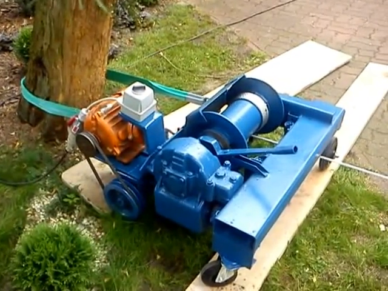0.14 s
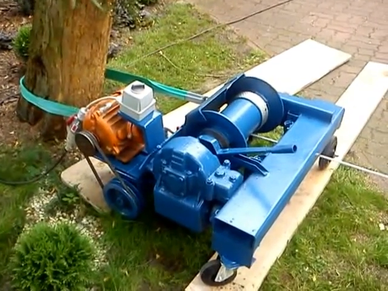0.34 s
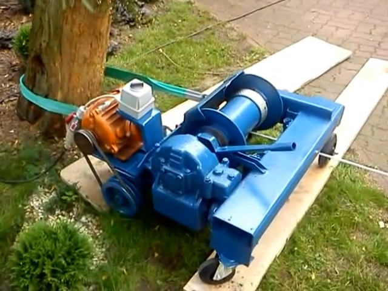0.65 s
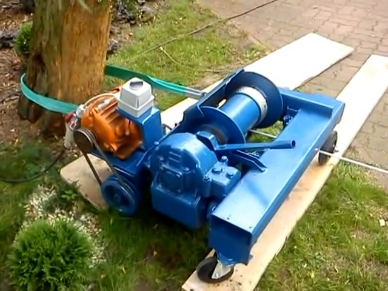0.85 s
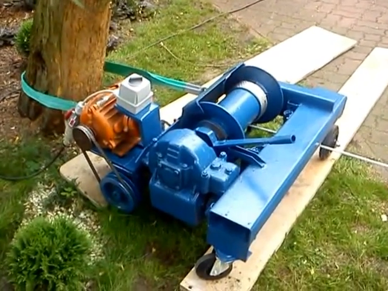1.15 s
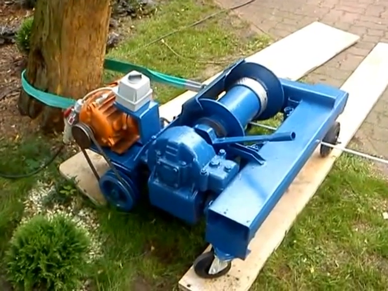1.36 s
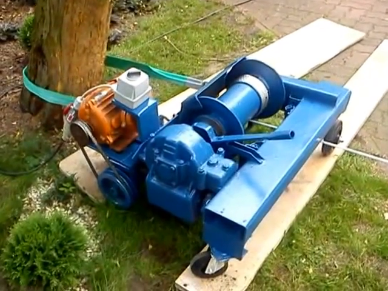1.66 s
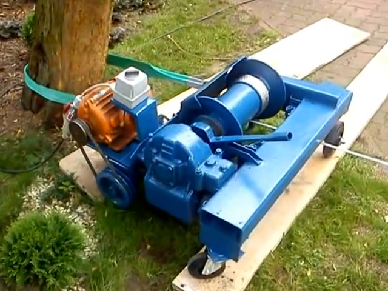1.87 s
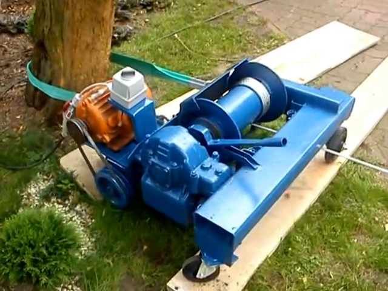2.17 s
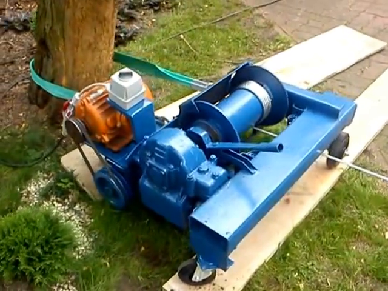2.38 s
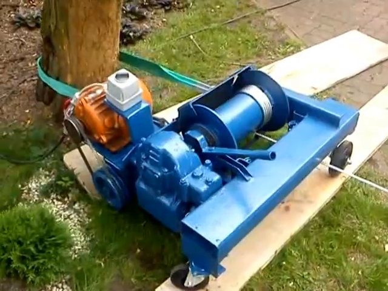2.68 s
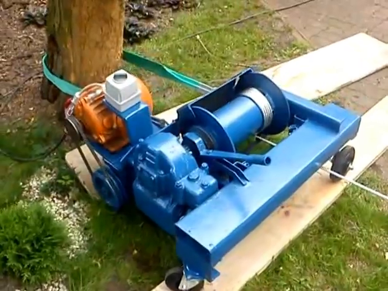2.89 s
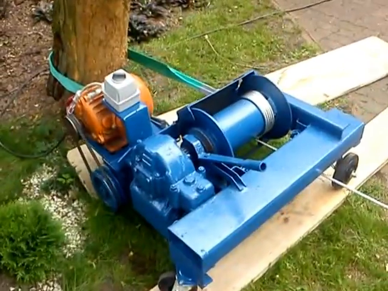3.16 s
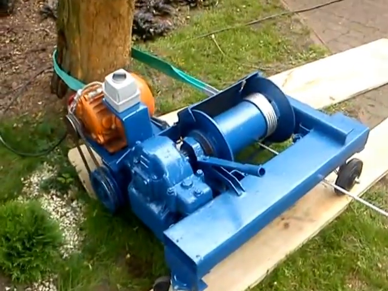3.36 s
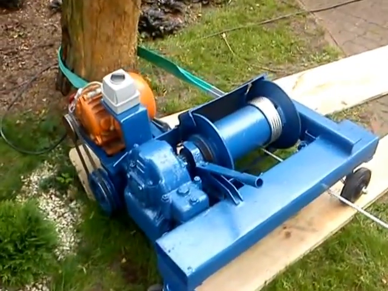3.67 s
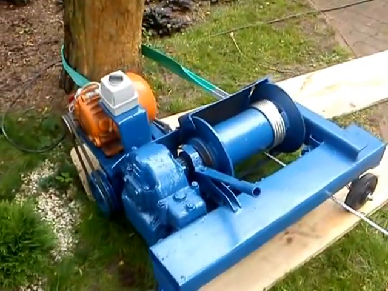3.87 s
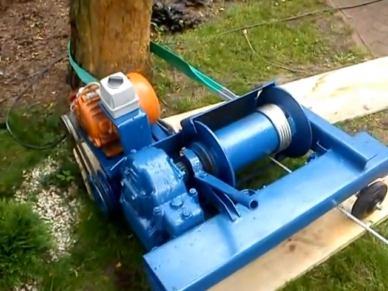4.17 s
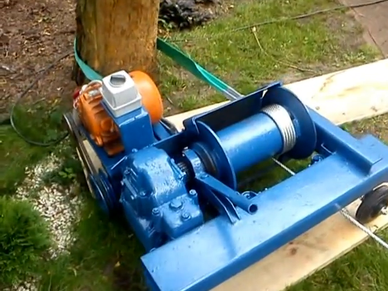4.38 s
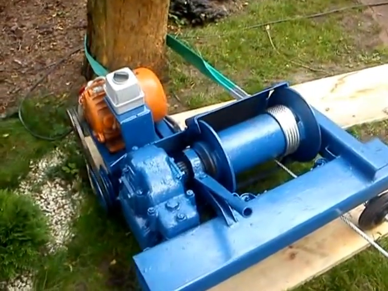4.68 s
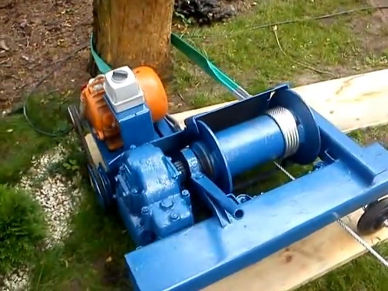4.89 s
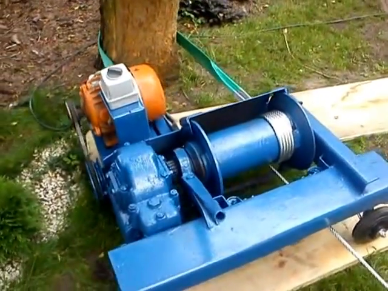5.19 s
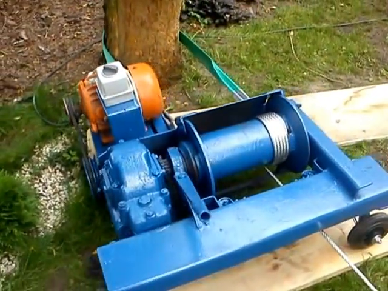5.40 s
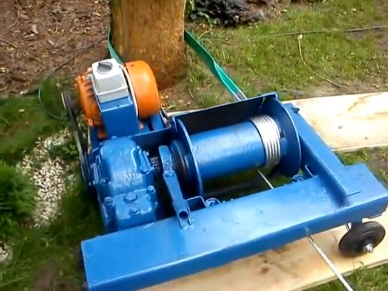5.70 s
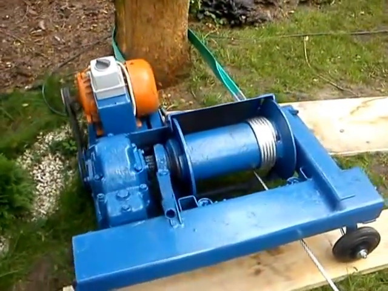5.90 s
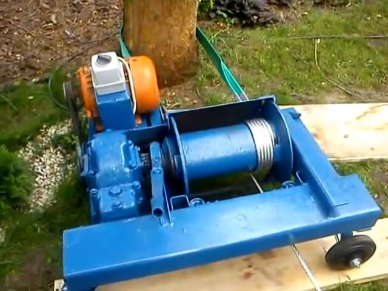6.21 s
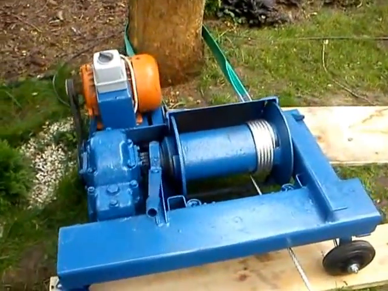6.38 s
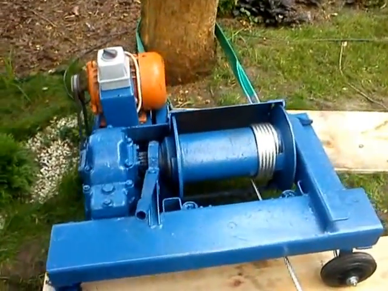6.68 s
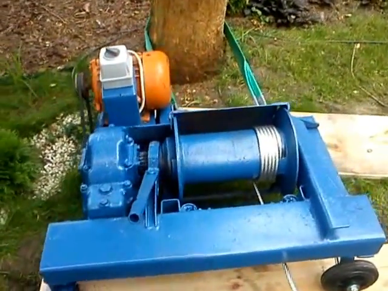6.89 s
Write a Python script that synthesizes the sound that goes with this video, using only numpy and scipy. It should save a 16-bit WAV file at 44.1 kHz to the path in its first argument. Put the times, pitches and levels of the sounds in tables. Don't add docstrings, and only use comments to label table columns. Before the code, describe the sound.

Continuous rough drone of a geared electric winch in a garden, with a high singing motor tone, bearing hiss and shifting metallic resonances.

```python
import sys
import numpy as np
from scipy import signal
from scipy.fft import rfft, irfft, next_fast_len
from scipy.io import wavfile
from scipy.ndimage import uniform_filter1d, map_coordinates

SR = 44100
rng = np.random.default_rng(int(sys.argv[2]) if len(sys.argv) > 2 else 0)


def invert_db(x):
    u = np.asarray(x, float) / 20
    return 10 ** u


def log_audio(samples):
    frames = np.atleast_2d(samples).T
    limited = np.clip(frames, -1, 1)
    pcm = np.round(limited * 32767).astype(np.int16)
    wavfile.write(sys.argv[1], SR, pcm)


N = 310905
T = np.arange(N) / SR
MOTOR_HZ, WORM_HZ = 24.5, 14.765


def unit(x):
    return x / np.sqrt(np.mean(x ** 2) + 1e-20)


def curves(rows):
    s, *cols = np.transpose(rows)
    return [np.interp(T, s, c) for c in cols]


def bump(v, centre, half):
    return np.exp(-((v - centre) / half) ** 2)


def wobble(rate):
    coarse = T[::64]
    knots = rng.standard_normal(int(N * rate / SR) + 4)
    return np.interp(T, coarse, map_coordinates(knots, [coarse * rate]))


def heard(db, slope_db=0, beams=()):
    beams_db = sum(gain_db * bump(T, s, half) for s, half, gain_db in beams)
    return invert_db(db + slope_db * (T - T.mean()) + beams_db)


def hiss_noise():
    return rng.standard_normal(N)


def coloured(x, gain):
    m = next_fast_len(N + 8192)
    return unit(irfft(rfft(x, m) * gain(np.fft.rfftfreq(m, 1 / SR)), m)[:N])


def shape(points):
    f, db = np.transpose(points)
    return lambda hz: invert_db(np.interp(np.log(hz + 1), np.log(f + 1), db))


def modes(rows):
    return lambda f: sum(invert_db(db) / (1 + ((f - c) / (w / 2)) ** 2) for c, w, db in rows)


def tone(hz, wander_hz, flutter_db, rate):
    phase = 2 * np.pi * (np.cumsum(hz + wander_hz * wobble(rate)) / SR + rng.random())
    return unit(invert_db(flutter_db * wobble(rate)) * np.sin(phase))


def turning(shaft_hz, repeat, drift):
    turns = rng.standard_normal((int(N / SR * drift) + 3, 4096))
    place = (T * shaft_hz % 1 * 4096).astype(int)
    row = (T * drift).astype(int)
    part = T * drift % 1 * np.pi / 2
    worn = np.cos(part) * turns[row, place] + np.sin(part) * turns[row + 1, place]
    return np.sqrt(repeat) * worn + np.sqrt(1 - repeat) * hiss_noise()


def stutter(shaft_hz, depth_db, order):
    angle = 2 * np.pi * shaft_hz * T
    pattern = sum(np.cos(k * angle + 2 * np.pi * rng.random() + .7 * wobble(.8))
                  for k in range(1, order + 1))
    return unit(invert_db(depth_db * unit(pattern)))


# t/s, level/dB
MOTOR_FACING = [(0, -0.5), (1.1, -3.5), (1.7, -2), (2.5, -1.5), (3.2, 1.5), (3.7, 0), (4.4, 2.5),
                (5.05, -2.5), (5.9, 1), (6.3, 2), (7.05, 2.5)]
# t/s, f/Hz
MAIN_SLOT = [(0, 1602), (4, 1602), (5.1, 1604.5), (6.4, 1601), (7.05, 1609)]
STRONG_SLOTS = [1651.3, 1750.2, 1820]
# level/dB, gain per facing/dB/dB, drift/dB/s
STRONG_LEVELS = [(-29, 2, 1.6), (-34.5, 1.5, -1.5), (-35.5, 0.5, 1.5), (-37.5, 0, 4)]
# t/s, half length/s, gain/dB
STRONG_BEAMS = [
    [(3.35, 0.15, 2), (4.15, 0.17, 2), (5.3, .3, 5.5), (6.25, .25, 2.5)],
    [(1.6, .35, 12), (2.05, 0.18, 7.5), (3.0, .3, 10), (4.6, 0.24, 12.5), (6.15, .15, 12)],
    [(.7, .3, 10), (2.5, .4, 0), (4.75, .3, 6), (5.8, .4, 1)],
    [(2.8, .2, 14), (3.2, 0.18, 8), (.6, .3, 12), (6.2, .2, 2)],
]
TONE_SHARE = [-1.2, -2.5, -3, -7]
# f/Hz, level/dB
WEAK_SLOTS = [(1553, -40), (1578, -40), (1676, -40), (1701, -40), (1845, -45), (1868, -42), (2376.7, -47)]


def motor():
    facing_db, = curves(MOTOR_FACING)
    pitches = curves(MAIN_SLOT) + STRONG_SLOTS
    song = 0
    for hz, (db, follow, slope), beams, share_db in zip(pitches, STRONG_LEVELS, STRONG_BEAMS, TONE_SHARE):
        gain = heard(db + share_db + follow * facing_db, slope, beams)
        song = song + gain * tone(hz, 0.79, flutter_db=1.5, rate=10)
    weak = sum(invert_db(db) * tone(hz, .8, flutter_db=2.5, rate=3) for hz, db in WEAK_SLOTS)
    return song + weak


# f/Hz, level/dB, drift/dB/s
STEADY_TONES = [(37, -42, 0), (114.4, -51, 0), (253, -46, 0),
                (487.2, -50, 0), (536.3, -43, .4), (588.8, -44, 0), (613, -43, -.3), (626.5, -44, 0),
             (635.9, -38, -1.3), (675.6, -39, -1.3), (734.8, -39.5, 1.1), (749, -48, 0), (759, -44, -.8),
             (823, -49, 2), (843.8, -42, .5), (1061.2, -43, 0), (1109.6, -39, 0)]
# t/s, half length/s, gain/dB
MESH_SHADOWS = [(2.9, 0.54, -5), (5.3, 0.94, -8.5)]
# t/s, level/dB, half length/s
TIGHT_TOOTH = [
    (.97, -27.5, 0.065),
    (2.978, -30, 0.16),
    (4.972, -30, 0.13),
    (6.95, -37, 0.087),
]
# t/s, level/dB, half length/s, f/Hz
DRY_BEARING = [
    (5.82, -34.5, .12, 3027),
    (6.23, -35.5, .09, 3020),
    (5.61, -44.5, .14, 5345),
]


def gear_tones():
    steady = sum(heard(db + 1.27, slope) * tone(hz, 0.81, flutter_db=1.7, rate=1.5)
                 for hz, db, slope in STEADY_TONES)
    beat_hz, peak_s, depth = 2.576, .287, 0.77
    beat = 1 + depth * np.cos(2 * np.pi * beat_hz * (T - peak_s))
    steady += heard(-35.5, -0.1) * unit(beat) * tone(564.4, 0.818, flutter_db=3.5, rate=2)
    steady += heard(-31, beams=MESH_SHADOWS) * tone(783.7, 0.905, flutter_db=1.2, rate=3)
    swell = sum(invert_db(db) * bump(T, s, half) for s, db, half in TIGHT_TOOTH)
    moan = tone(1213, 3, flutter_db=2.5, rate=15)
    moan += invert_db(-3) * tone(1112, 3, flutter_db=2.5, rate=15)
    squeal = sum(invert_db(db) * bump(T, s, half) * tone(hz, 6, flutter_db=1.5, rate=25)
                 for s, db, half, hz in DRY_BEARING)
    return stutter(WORM_HZ, 0.72, order=3) * steady + swell * moan + squeal


# f/Hz, level/dB
WALL_SHAPE = [(380, -120), (450, -12), (560, -1), (680, -8), (800, -3), (960, -5), (1130, -2), (1260, -3.5),
              (1360, 2), (1470, -6), (1560, -120)]
# f/Hz, width/Hz, level/dB
COVER_MODES = [(1621, 160, 1), (1504, 45, -5.5), (1680, 60, -8)]
FRAME_MODES = [(2057, 160, 0.5), (2260, 186, -3), (1916, 65, -3), (1808, 110, -6)]
# f/Hz, level/dB
FIN_SHAPE = [(2300, -120), (2420, 1), (2650, 2), (2800, -1.5), (3050, 0), (3450, -1), (3600, -5.5),
             (4300, -9.5), (4800, -16), (5100, -120)]
# t/s, half length/s, gain/dB
WALL_SWELLS = [(0, 0.2, 2), (2.4, 0.43, -1.5), (5.2, 0.38, 2), (7.05, 0.25, 2)]
FRAME_SWELLS = [(0, .8, 1.5), (2.4, 0.29, 4), (4.802, 0.87, 2)]
FIN_SWELLS = [(3.4, 0.25, 2.5), (5.6, 0.17, 2)]


def casing():
    facing_db, = curves(MOTOR_FACING)
    walls = heard(-24.5, 0.08, WALL_SWELLS) * coloured(turning(WORM_HZ, 0.22, 1.52), shape(WALL_SHAPE))
    cover_noise = stutter(MOTOR_HZ, 1.16, order=4) * hiss_noise()
    cover = heard(-22) * invert_db(.6 * facing_db) * coloured(cover_noise, modes(COVER_MODES))
    frame = heard(-24, 0.35, FRAME_SWELLS) * coloured(turning(MOTOR_HZ, 0.091, 3.06), modes(FRAME_MODES))
    fin_noise = stutter(WORM_HZ, 0.6, order=3) * hiss_noise()
    fins = heard(-27.5, 0, FIN_SWELLS) * invert_db(0.63 * wobble(9)) * coloured(fin_noise, shape(FIN_SHAPE))
    return walls + cover + frame + fins


# f/Hz, level/dB
HISS_SHAPE = [(4500, -120), (4800, -4.5), (5400, 1), (5950, -0.5), (6400, -3.5), (6750, -4), (7200, -8.5),
              (7800, -9.5), (8400, -8.5), (9000, -120)]
AIR_SHAPE = [(8300, -120), (8500, -7), (9000, 2), (9900, -0.5), (10500, 2), (10900, -3.5), (11400, -2.5),
             (12300, -8), (12700, -1), (13250, -9), (13700, -4), (13900, -2), (13980, -120)]
# t/s, half length/s, gain/dB
HISS_SWELLS = [(2.6, 0.6, 1.7), (5.4, 0.66, 1.8)]
WHINE_SHADOWS = [(3.42, .17, -6), (4.45, .4, -4), (3.75, .15, 1.5), (5.4, .4, -3), (6.7, .5, -2.5)]
UPPER_SWELLS = [(1.7, .5, 4.5), (2.4, .2, -6), (3.75, .3, 3), (5.8, .3, 4)]


def bearings():
    hiss = coloured(stutter(WORM_HZ, 0.65, order=3) * hiss_noise(), shape(HISS_SHAPE))
    hiss = invert_db(0.52 * wobble(9)) * hiss
    whine = coloured(stutter(WORM_HZ, 2.6, order=6) * hiss_noise(), modes([(8225, 180, 0)]))
    upper = coloured(stutter(WORM_HZ, 4.5, order=6) * hiss_noise(),
                     modes([(9550, 300, 0), (9200, 250, -5)]))
    air = invert_db(4.5 + .8 * wobble(6.16)) * coloured(hiss_noise(), shape(AIR_SHAPE))
    return (heard(-39.5, 0.04, HISS_SWELLS) * hiss + heard(-50.5, -.6, WHINE_SHADOWS) * whine
            + heard(-59.5, -1.1, UPPER_SWELLS) * upper + heard(-58) * air)


# t/s, half length/s, f/Hz,
# gain/dB
PANEL_BEAMS = [(.51, .52, 1291, 6.1), (.56, .57, 2540, 3.6), (.75, .76, 5415, 4.2), (1.71, .28, 2680, 3.7),
               (2.09, .58, 5803, 4.2), (2.44, .88, 6675, 4.4), (2.47, .27, 5609, 3.6),
               (3.73, .34, 5932, 5.6), (4.36, .63, 3445, 5), (3.5, .45, 2055, 3), (4.35, .3, 2070, 5),
               (5.15, .35, 2125, 2.5), (3.8, .6, 2235, -3), (4.71, .34, 5652, 4.8), (4.97, .29, 1216, 4.6),
               (5.46, .5, 958, 5.4), (5.55, .3, 5340, 2.5), (6.59, .36, 6352, 3.7), (6.67, .31, 915, 4.3),
               (2.3, 0.59, 1360, 4), (4.22, 0.32, 1350, 5), (5.6, 0.3, 610, 4.5),
                  (0.89, 0.071, 1190, 5.5)]
# first t/s, f/Hz, gain/dB
IDLER_RINGS = [
    (1.6, 3688, 5.5),
    (0.69, 2980, 1.5),
]


def panels(x, patchy_db):
    hz, t, z = signal.stft(x, SR, nperseg=2048)
    field = uniform_filter1d(rng.standard_normal(z.shape), 5, 0)
    field = uniform_filter1d(field, 36, 1)
    turn_s, half_s, half_hz = 1.71, 0.48, 65
    rings = [(s + k * turn_s, half_s, c, db) for s, c, db in IDLER_RINGS for k in range(4)]
    beams = sum(db * bump(t, s, half) * bump(hz, c, half_hz)[:, None]
                for s, half, c, db in PANEL_BEAMS + rings)
    return signal.istft(z * invert_db(1.3 * beams + patchy_db * unit(field)), SR, nperseg=2048)[1][:N]


# f/Hz, level/dB
KNOCK_SHAPE = [(120, -120), (145, 0), (175, -4.5), (220, -1.5), (270, -1), (340, -4.5), (450, -5.5),
               (500, -120)]
RUMBLE_SHAPE = [(5, -120), (12, -16), (22, -3), (35, -0.5), (70, 1), (100, -3), (140, -7), (170, -120)]
# t/s, half length/s, gain/dB
ORDER_SWELLS = [(1.4, 0.46, 2.5), (4.5, 0.37, -3), (5.5, .2, 5.5), (6.8, .2, 3.5)]
RUMBLE_SWELLS = [(.5, 1.2, 1.5), (3.6, 0.15, 0.5), (6, 1.7, 5.5)]


def drum():
    knock = heard(-32, 0.75) * coloured(turning(WORM_HZ, .4, .9), shape(KNOCK_SHAPE))
    order = heard(-39, -0.83, ORDER_SWELLS) * tone(14 * WORM_HZ, .3, flutter_db=2.5, rate=5)
    rumble = heard(-36, 0, RUMBLE_SWELLS) * coloured(hiss_noise(), shape(RUMBLE_SHAPE))
    return knock + order + rumble


# t/s, swish level/dB, half length/s, thump level/dB
FOOTSTEPS = [
    (3.5, -57, .09, -26),
]


def step():
    swish = sum(invert_db(db) * bump(T, s, half) for s, db, half, _ in FOOTSTEPS)
    thump = sum(invert_db(db) * bump(T, s + 0.07, 0.031) for s, _, _, db in FOOTSTEPS)
    blades = shape([(7500, -120), (8600, -3), (11500, 0), (12500, 2), (14000, -120)])
    grass = coloured(hiss_noise(), blades)
    soil = coloured(hiss_noise(), modes([(228, 110, 0)]))
    return swish * grass + thump * soil


# t/s, f/Hz
ENGINE_PITCH = [(0, 74.4), (6.3, 75.1), (6.6, 74.3), (7.05, 71.3)]
# t/s, half length/s, gain/dB
HUM_RISES = [(.35, 0.57, 16.3), (2.1, 0.37, 3.5), (4.4, .6, 4.1)]
ENGINE_RISES = [(6.49, 0.76, 17), (5.5, 0.13, 9), (4.17, 0.32, 8), (2.86, 0.17, 8)]
OCTAVE_RISES = [(6.35, 0.21, 15.3), (4.9, 0.75, 9.1)]


def far_engine():
    pitch_hz, = curves(ENGINE_PITCH)
    hum = heard(-45, beams=HUM_RISES) * tone(57.2, 1.0, flutter_db=1.5, rate=6)
    engine = heard(-45, beams=ENGINE_RISES) * tone(pitch_hz, 1.2, flutter_db=1.5, rate=9)
    octave = heard(-47.5, beams=OCTAVE_RISES) * tone(2 * pitch_hz, 1.56, flutter_db=0.5, rate=9)
    return hum + engine + octave


def scene():
    winch = motor() + gear_tones() + panels(casing() + bearings(), patchy_db=1.2) + drum()
    return (winch + far_engine() + step())[None]


def band_limit(x):
    return signal.sosfilt(signal.butter(12, 14050, fs=SR, output="sos"), x)


def record(dry):
    ceiling, hardness = .74, 5
    mix = dry / (1 + np.abs(dry / ceiling) ** hardness) ** (1 / hardness)
    return band_limit(mix)


dry = scene()
out = record(dry)
log_audio(out)
```